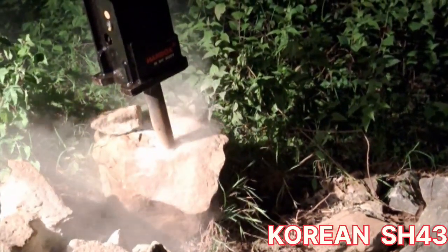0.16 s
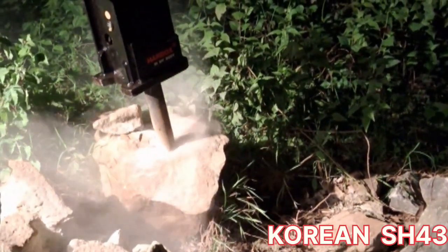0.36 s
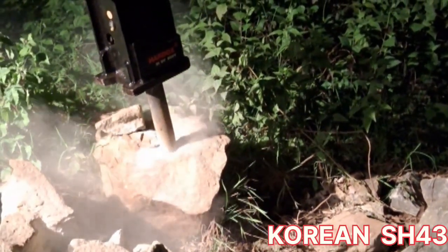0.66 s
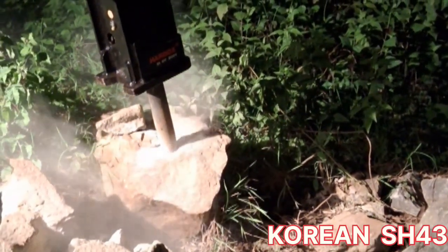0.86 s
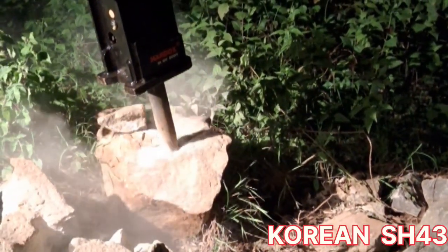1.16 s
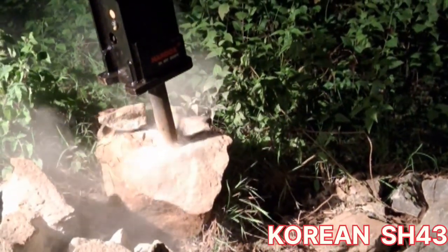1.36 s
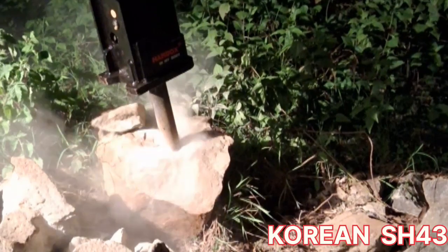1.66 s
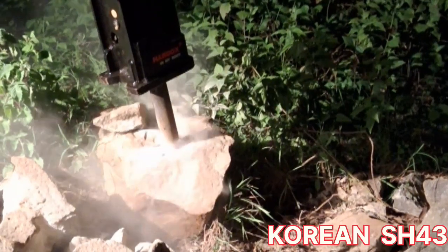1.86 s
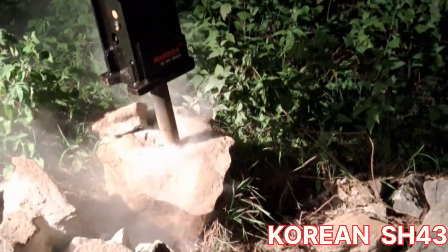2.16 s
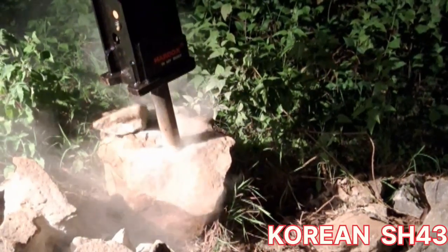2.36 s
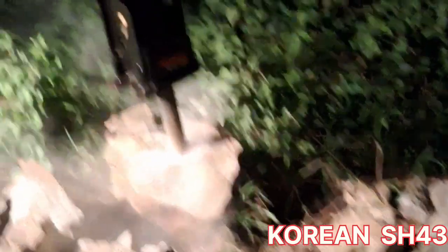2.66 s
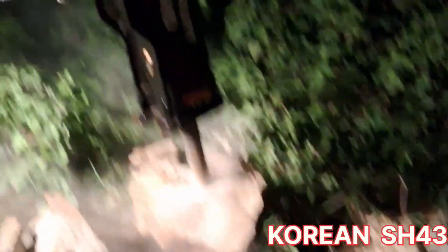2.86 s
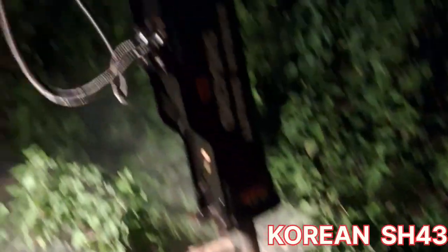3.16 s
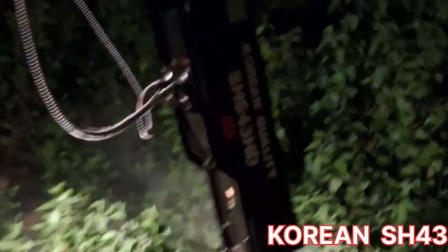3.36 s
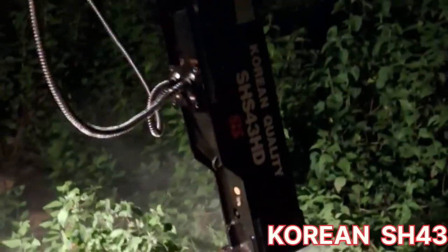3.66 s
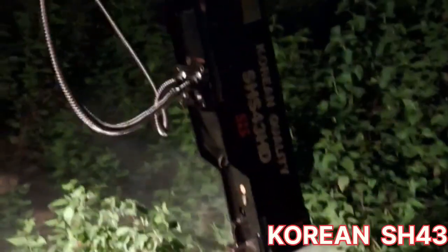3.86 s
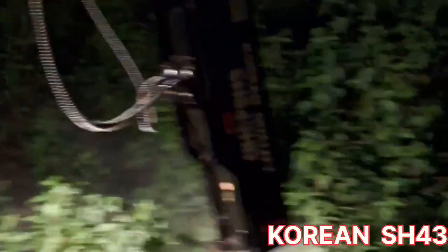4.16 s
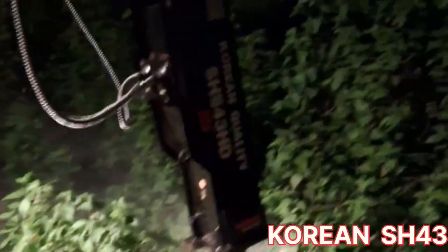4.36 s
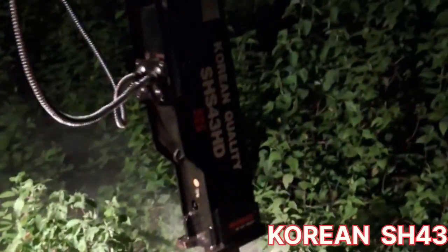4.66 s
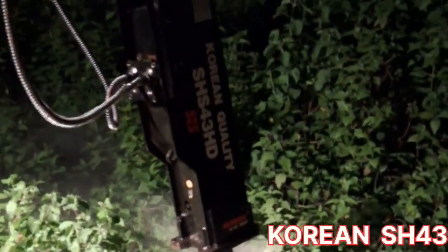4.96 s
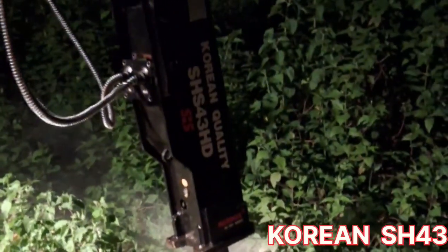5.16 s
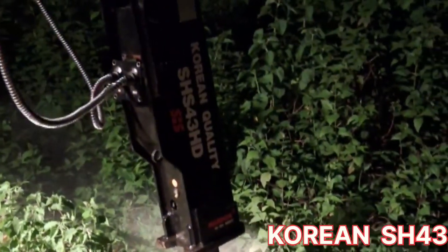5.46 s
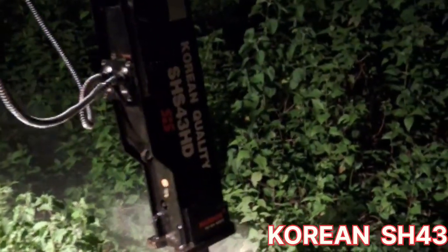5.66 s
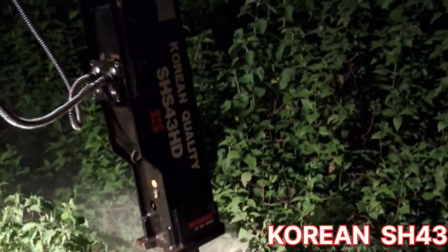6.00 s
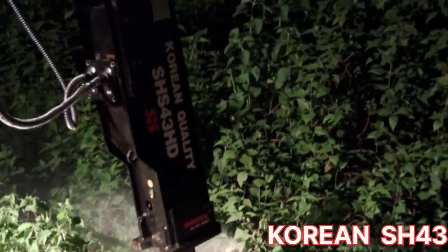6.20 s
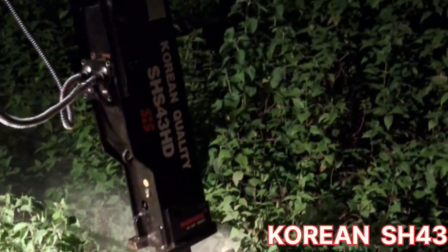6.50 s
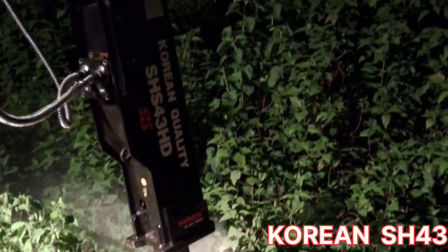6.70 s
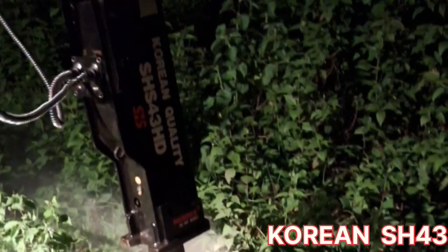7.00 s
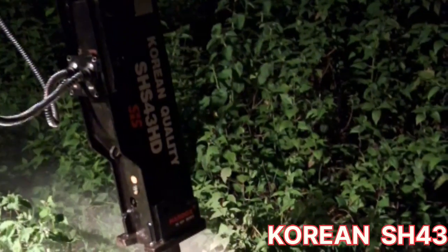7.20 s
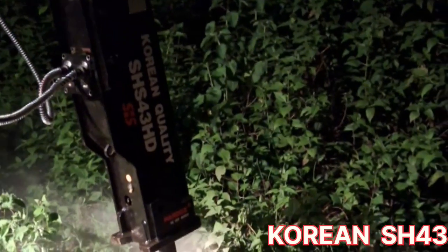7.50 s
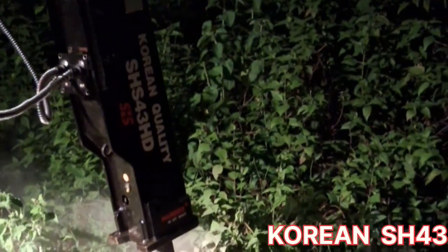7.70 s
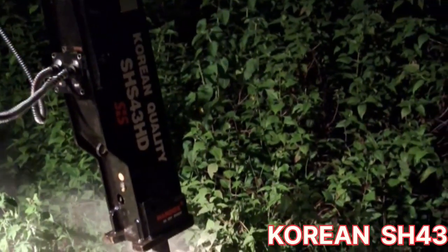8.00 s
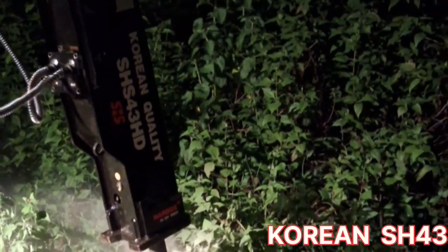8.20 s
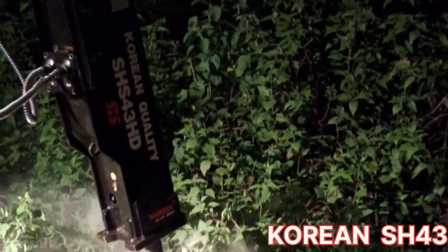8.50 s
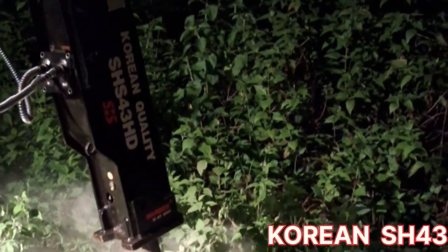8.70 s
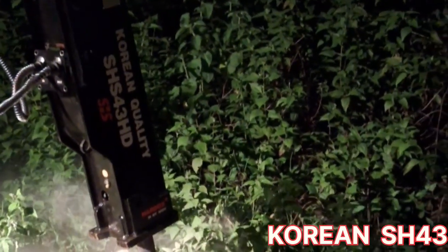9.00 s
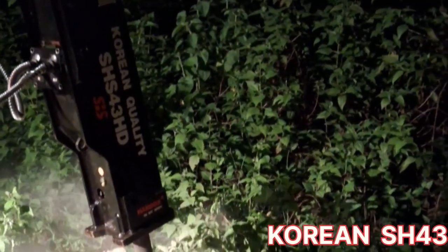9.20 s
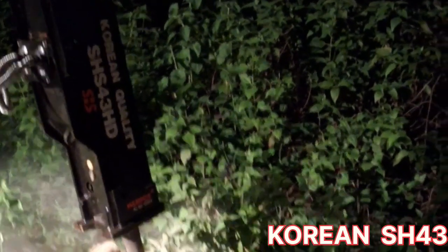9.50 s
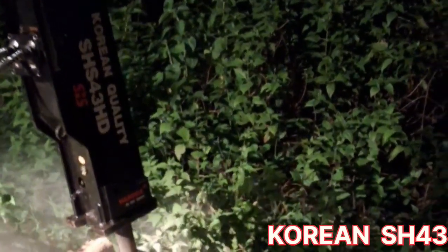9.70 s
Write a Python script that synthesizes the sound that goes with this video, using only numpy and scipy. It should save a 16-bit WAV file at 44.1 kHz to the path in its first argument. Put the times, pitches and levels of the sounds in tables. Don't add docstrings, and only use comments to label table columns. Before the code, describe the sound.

A hydraulic breaker hammers a boulder in three rapid bursts of ringing metallic blows, loose parts rattling, with a diesel engine idling behind in the pauses.

```python
import sys
import numpy as np
from scipy import signal
from scipy.io import wavfile
from scipy.ndimage import uniform_filter1d

SR = 44100
rng = np.random.default_rng(int(sys.argv[2]) if len(sys.argv) > 2 else 0)


def inscribe(sig):
    pcm = np.round(np.clip(np.atleast_2d(sig).T, -1, 1) * 32767)
    wavfile.write(sys.argv[1], SR, pcm.astype(np.int16))


def gain_from_db(level_db):
    decades = np.asarray(level_db, float) / 20
    return 10 ** decades


N = 434364


def breaker():
    s, housing_db, chisel_db, rattle_db, crack_db, chisel_hz = blows()
    out = crack(s, crack_db, housing_db + 2.5)
    out += chisel(s, chisel_db, chisel_hz, aim_at(s))
    out += housing(s, housing_db)
    out += steel(s, rattle_db)
    out += rattle(s, rattle_db)
    out += valve(s, rattle_db)
    return signal.sosfilt(signal.butter(2, 80, "high", fs=SR, output="sos"), out) + oil()


# blow number, time in seconds.
PACE = [(0, .0685), (5, .5257), (6, 1.1945), (12, 1.7332), (22, 2.6493), (27, 3.1040), (38, 4.1108),
        (50, 5.2135), (59, 6.0388), (68, 6.8658), (69, 7.5180), (73, 7.8772), (76, 8.1537), (78, 8.3420),
        (81, 8.6277)]


def strokes():
    number = np.arange(PACE[-1][0] + 1)
    s = np.interp(number, *np.transpose(PACE))
    opens = np.r_[True, np.diff(s) > .3]
    since = number - np.maximum.accumulate(number * opens)
    limp_s, limp_blows = .0018, 6
    late_s = limp_s * (since % 2) * np.exp(-since / limp_blows)
    return s + late_s, s[opens], s[np.r_[opens[1:], True]]


# time in seconds, aim from 0 to 1.
AIM = [
    (0, 0.02),
    (2.8, 0),
    (3.3, 0.59),
    (5.2, 0.57),
    (6.9, 1),
    (8.7, 0.81),
]


def aim_at(s):
    return np.interp(s, *np.transpose(AIM))


# time in seconds, force of the blows in dB,
# damping of the chisel by the stone in dB, recoil into the housing in dB.
TOOL = [(0, 0, -5, 0), (.55, 0, -6.5, 0.5), (1.2, -0.5, -2, -2.5), (1.6, -0.5, -4, 0.5), (1.85, 2, -3, 0.5),
        (2.9, 0, -4.5, 2), (3.3, 1, -2.5, -2.5), (3.47, -1.5, 1, 3.5), (3.75, -2.5, -2, -1.5),
        (4.0, 0, -3, -0.5), (4.5, 1.5, -4, -1.5), (5.3, 1, -3.5, 0), (5.55, 2.5, 3, -1), (6.25, 1, 1.5, 1),
        (6.9, 0.5, -2.5, -1.5), (7.6, 0, 1.5, -1), (8.05, 0, -5.5, 2.5), (8.65, 1.5, 4, 1)]


def blows():
    s = strokes()[0]
    aim, luck = aim_at(s), rng.standard_normal((len(s), 5))
    at, *columns = np.transpose(TOOL)
    force_db, damping_db, recoil_db = [np.interp(s, at, c) for c in columns]

    def level(tip_db, aim_gain_db, spread_db, chance):
        return tip_db + aim_gain_db * aim + spread_db * chance

    housing_db = level(-19.5, 5, 1, luck[:, 0]) + force_db + recoil_db
    chisel_db = level(-6.5, -3, 0.65, luck[:, 1]) + force_db - damping_db
    rattle_db = level(-21.5, 4.35, 1.3, luck[:, 2]) + force_db
    crack_db = level(-6.5, 3, .5, luck[:, 3])
    chisel_hz = 1950 + (30 + 40 * aim) * luck[:, 4]
    return s, housing_db, chisel_db, rattle_db, crack_db, chisel_hz


# delay in ms, level in dB, polarity.
CONTACTS = [
    (2.35, 4.5, -0.37),
    (6.4, -3, -1.24),
    (9.0, -52, -1.1),
    (11.2, -4.5, -0.99),
    (16.5, -19.5, -1.64),
]


def contacts(times, first_db, later_db):
    out, draws = train(times, first_db), rng.standard_normal((len(times), len(CONTACTS), 2))
    for k, (ms, db, polarity) in enumerate(CONTACTS):
        late_s = ms / 1000 * (1 + 0.012 * draws[:, k, 0])
        out = out + polarity * train(times + late_s, later_db + db + 3.7 * draws[:, k, 1])
    return out


def crack(times, first_db, later_db):
    t = np.arange(-60, 61) / SR
    cycle = np.sin(2 * np.pi * 1000 * t) * np.exp(-(t / .0004) ** 2)
    return np.convolve(contacts(times, first_db - .3, later_db), cycle, "same") * gain_from_db([[1.8], [-1.8]])


def chisel(times, levels_db, pitches_hz, aims):
    out, t = np.zeros((2, N + 4000)), np.arange(4000) / SR
    slack = t + .18 * .003 * (1 - np.exp(-t / .003))
    wider_by, shorter_by = 0.85, 0.44
    side = np.array([0, 1, 1, 1])
    draws = rng.standard_normal((len(times), 2, 4, 3))
    for s, db, hz, aim, draw in zip(times, levels_db, pitches_hz, aims, draws):
        spread = np.array([-0.0264, -0.103, 0.034, 0.139]) * (1 + wider_by * aim)
        spread = spread + 0.023 * draw[0, :, 0] * side
        mode_db = np.array([0, -5, -3, -8]) - 4 * (1 - aim) * side
        sizes = gain_from_db(db - 5 + mode_db + 1.6 * draw[..., 1])
        tone = np.sin(2 * np.pi * hz * (1 + spread)[:, None] * slack + .35 * draw[..., 2:])
        free_s = np.maximum(t / (1 - shorter_by * aim) - .0055, 0)
        shape = (1 - np.exp(-t / .0004)) * gain_from_db(-60 * free_s / .024)
        at = round((s + 0.001778) * SR)
        out[:, at:at + len(t)] += np.sum(sizes[..., None] * tone, axis=1) * shape
    return out[:, :N]


# pitch in Hz, level in dB, t60 in seconds.
HOUSING = [(178.8, -18, 0.89), (204.8, -24, 0.55), (275.4, -32, 0.99), (484.7, -3.5, 0.16),
           (609.3, 2, 0.27), (663.5, -7, 0.32), (680.6, -1, 0.18), (929, -9, 0.39), (967, -2, 0.071),
           (1200, -54, .12)]
LOWER_PLATE = [(413.3, -10, 0.71)]
UPPER_PLATE = [(488, -8, .12), (598, -3, .13)]


def housing(s, housing_db):
    shocks = blow_train(s, housing_db)
    shaking = gain_from_db(-4) * chatter(dying(shocks, t60=0.072, rise_s=0.011), per_s=1500)
    shaking += gain_from_db(-20.0) * habit(shocks, length_s=0.0071, rise_s=0.0055)
    struck = gain_from_db(6.0) * contacts(s, housing_db - 0.5, housing_db) * [[1], [.3]]
    clamp = dying(train(np.r_[0, s], 0), t60=.24, rise_s=.012)
    aim, held = aim_at(np.arange(N) / SR), pressure_gain()
    lower_db = -14 - 40 * np.maximum(aim - 0.59, 0)
    out = held * gain_from_db(lower_db) * modes(LOWER_PLATE, shaking)
    out += held * gain_from_db(-36 + 18 * aim) * modes(UPPER_PLATE, shaking)
    return out + gain_from_db(-13.5) * clamp * modes(HOUSING, shaking + struck)


def habit(clicks, length_s, rise_s):
    t = np.arange(2000) / SR
    shove = rng.standard_normal((2, len(t))) * (t / rise_s) * np.exp(-t / length_s) * [[1], [.4]]
    return signal.oaconvolve(clicks[None], shove, axes=1)[:, :N]


# pitch in Hz, level
# in dB, t60 in seconds.
STEEL = [(1800, -2, 0.034), (1987, -8, 0.13), (2225, -1, 0.044), (2500, -39.5, 0.082), (3110, -1, 0.021),
         (3347, -7.5, 0.067), (3802, -6, 0.031), (4860, -7, 0.028), (5126, -12, 0.054), (6768, -9, 0.032),
         (6730, -26.5, 0.31), (7180, -14, 0.049), (7440, -10, 0.011)]
HIGH_STEEL = [(8600, -17, .04), (8885, -14, .045), (10700, -11, .017), (10950, -15, .035), (11150, -11, .025),
              (11650, -12, .012), (12100, -14, .012), (12950, -12, .015), (13150, -15, .03), (13450, -13, .025),
              (15070, -12, .018)]


def steel(s, rattle_db):
    jolts = dying(rattle_train(s, rattle_db), t60=0.11, rise_s=0.000076)
    shaken = pressure_gain() * (jolts + gain_from_db(1.0) * valve_shift(s, rattle_db))
    return gain_from_db(-13.0) * modes(STEEL + HIGH_STEEL, chatter(shaken, per_s=3000))


# pitch in Hz, level in dB per Hz; then pitch in Hz, t60 in seconds.
RATTLE = [(120, -40), (330, -27), (560, -6.5), (800, -12.5), (1000, -8), (1300, -18), (2000, -2),
          (2730, -16), (4500, -14), (6000, -28.5), (9800, -30.5), (12000, -37), (16400, -35)]
RATTLE_T60 = [(150, 0.28), (600, 0.16), (2000, 0.14), (5000, 0.17), (15000, 0.4)]


def rattle(s, rattle_db):
    jolts = rattle_train(s, rattle_db)

    def envelope_at(hz):
        return dying(jolts, at_hz(RATTLE_T60, hz), rise_s=0.000079)

    return gain_from_db(2.5) * pressure_gain() * banded_noise(RATTLE, envelope_at, patchy_db=0.0, lowest_hz=100)


# pitch in Hz, level in dB per Hz.
VALVE = [(1500, -4), (3000, -8), (6000, -7), (11000, -18), (16500, -15)]


def valve(s, rattle_db):
    shift = valve_shift(s, rattle_db)
    return pressure_gain() * banded_noise(VALVE, lambda hz: shift, patchy_db=3.5, lowest_hz=790)


def valve_shift(s, rattle_db):
    return dying(train(s - .020, -35.5 + 0.15 * (rattle_db + 6)), t60=0.45, rise_s=0.0028)


def blow_train(s, levels_db, delay_s=0):
    return train(np.r_[0, s] + delay_s, np.r_[levels_db[0] - 5, levels_db])


def rattle_train(s, rattle_db):
    return blow_train(s, rattle_db, delay_s=0.00132)


def load():
    _, firsts, lasts = strokes()
    t = np.arange(N) / SR

    def ramp(s):
        return np.clip((t - s) / 0.024 + .5, 0, 1)

    return 1 + sum(ramp(s - 0.051) for s in firsts[1:]) - sum(ramp(s + 0.082) for s in lasts)


def pressure_gain():
    return gain_from_db(-2.5 * (1 - load()))


# time in seconds, level in dB, rise in seconds.
VENTS = [
    (.78, -52, 0.092),
    (9.85, -52, .15),
]


def oil():
    t, fall_s = np.arange(N) / SR, 0.013
    puffs = [(s - fall_s, -34, 0.072) for s in strokes()[1][1:]] + VENTS
    level = 0
    for s, db, rise_s in puffs:
        away = np.maximum((s - t) / rise_s, (t - s) / max(rise_s, fall_s))
        level = level + gain_from_db(db - 30 * away)
    high = signal.butter(2, [10500, 16500], "band", fs=SR, output="sos")
    return level * rms_one(signal.sosfilt(high, rng.standard_normal((2, N))))


# time in seconds, level in dB, share of its low modes in dB.
CLANKS = [
    (.791, -35, -13),
    (9.006, -36.5, 1),
]
# pitch in Hz, level in dB, t60 in seconds.
PIN = [(670, 0, .05), (940, -7, .06), (1650, -2, .035), (2050, -5, .03), (2350, -2, .025)]


def pin():
    s, peak_db, low_db = np.transpose(CLANKS)

    def knock(db):
        return chatter(dying(train(s, db), t60=0.04, rise_s=0.00038), per_s=7000)

    return gain_from_db(-8) * (modes(PIN[:3], knock(peak_db + low_db)) + modes(PIN[3:], knock(peak_db)))


# time in seconds, second order in Hz, throttle in dB, pump whine in dB.
THROTTLE = [(0, 94, 1, -2), (1.1, 94, 1.5, -22), (7.0, 94.5, 4.5, -1), (7.45, 94.5, 2.5, -1.5),
            (8.6, 94.3, 7, -10), (8.85, 96.5, 4, -5), (9.45, 96.5, 3, -17), (9.65, 96.6, 3, 0),
            (9.85, 97, 7.5, -8)]
ORDERS = [.5, 1, 1.5, 3, 3.5, 5]
ORDER_DB = [-7.5, -1.5, -16, -8, -18, -16]
WHINE_ORDERS = [7.5, 10.5]
# pitch in Hz, level in dB, t60 in seconds.
PUMP = [(286.6, -5.5, 0.053), (712.6, -0.5, 0.25), (980, 6, 0.12), (1300, -19, 0.1), (1350, -29, 0.069)]
# pitch in Hz, level in dB per Hz.
IDLE = [(25, -28), (40, -29), (70, -31), (120, -15.5), (180, -13), (290, -19), (400, -16), (690, -20),
        (1000, -19), (1500, -20.5), (4100, -30), (5500, -37), (14000, -41), (16400, -38)]


def engine():
    (free_hz, throttle_db, whine_db), work = in_time(THROTTLE), load()
    hz = free_hz - .9 * work
    hum_db = -48.5 + throttle_db - .5 * work
    noise_db = -52.5 + throttle_db + 9.5 * work
    turns = 2 * np.pi * np.cumsum(hz) / SR

    def wander():
        return 0.24 * drift(5.6)

    hum = 0
    for k, db in zip(ORDERS, ORDER_DB):
        ears = np.array([wander(), 0.16 + wander()])
        hum = hum + gain_from_db(db + 0.82 * drift(6.4)) * np.sin(k * (turns + wander()) + ears)
    whine = 0
    for k in WHINE_ORDERS:
        whine = whine + gain_from_db(-58 + whine_db + 2 * drift(6)) * np.sin(k * turns + .6 * drift(15))
    pump = gain_from_db(-4.5) * rms_one(modes(PUMP, rng.standard_normal((2, N))))
    block = banded_noise(IDLE, lambda hz: 1, patchy_db=.7, lowest_hz=25)
    return np.sqrt(2) * (gain_from_db(hum_db) * hum + whine) + gain_from_db(noise_db) * (pump + block)


def rms_one(x):
    return x / np.sqrt(np.mean(x ** 2) + 1e-20)


def in_time(rows):
    s, *columns = np.transpose(rows)
    return [np.interp(np.arange(N) / SR, s, c) for c in columns]


def at_hz(points, hz):
    table_hz, values = np.transpose(points)
    return np.interp(np.log(hz), np.log(table_hz), values)


def drift(rate):
    r = np.exp(-80 * np.pi * rate / SR)
    slow = signal.lfilter([1], [1, -2 * r, r * r], rng.standard_normal(N // 40 + 2002))[2000:]
    return np.interp(np.arange(N) / 40, np.arange(len(slow)), rms_one(slow))


def train(times, levels_db):
    clicks = np.full(N, 1e-18)
    clicks[np.clip(np.round(np.asarray(times) * SR).astype(int), 0, N - 1)] = gain_from_db(levels_db)
    return clicks


def dying(clicks, t60, rise_s):
    r, up = gain_from_db(-60 / (t60 * SR)), np.exp(-1 / (rise_s * SR))
    return signal.lfilter([1 - up], [1, -up], signal.lfilter([1], [1, -r], clicks))


def chatter(envelope, per_s):
    return envelope * (rng.random((2, N)) < per_s / SR) * rng.standard_normal((2, N)) + 1e-18


def ring(force, hz, t60):
    r, w = gain_from_db(-60 / (t60 * SR)), 2 * np.pi * hz / SR
    return signal.lfilter([0, np.sin(w)], [1, -2 * r * np.cos(w), r * r], force)


def modes(table, force):
    return sum(gain_from_db(db) * pair(*ring(force, hz, t60), hz) for hz, db, t60 in table)


def banded_noise(spectrum, envelope_at, patchy_db, lowest_hz):
    edges = 2 ** np.arange(np.log2(lowest_hz), np.log2(18200), .5)
    centres = np.sqrt(edges[1:] * edges[:-1])
    total = np.sqrt(np.sum(gain_from_db(at_hz(spectrum, centres)) ** 2 * np.diff(edges)) / (SR / 2))
    out, white = 0, rng.standard_normal((2, 2, N))
    for k, hz in enumerate(centres):
        band = signal.butter(2, edges[k:k + 2], "band", fs=SR, output="sos")
        mid, side = signal.sosfilt(band, white[k % 2])
        gain = gain_from_db(at_hz(spectrum, hz) + patchy_db * drift(36)) / total
        out = out + gain * envelope_at(hz) * pair(mid, side, hz)
    return out


# pitch in Hz, left-right likeness; then pitch in Hz, left over right in dB.
LIKENESS = [(60, 0.88), (180, 1), (550, 0.62), (1650, 0.023), (4970, 0.019), (15000, 0.01)]
LEFT_OVER_RIGHT = [(60, 0), (130, 1), (290, 3), (640, -1), (1200, 2.5), (2000, 1.5), (4000, -1.3),
                   (8000, -1.7), (15000, .6)]


def pair(mid, side, hz):
    alike, lean_db = np.clip(at_hz(LIKENESS, hz), 0, 1), at_hz(LEFT_OVER_RIGHT, hz) / 2
    both = np.sqrt(1 + alike) * mid + np.sqrt(1 - alike) * side * [[1], [-1]]
    return both * gain_from_db([[lean_db], [-lean_db]])


def scene():
    out = breaker() + pin() + engine() * gain_from_db([[-1.2], [1.2]])
    return np.array([np.roll(out[0], 2), out[1]])


def starved(x, margin_db, edge_db):
    hz, _, frames = signal.stft(x, SR, nperseg=1536)
    bands = frames[:, :768].reshape(2, 96, 8, -1)
    level_db = 10 * np.log10(np.mean(np.abs(bands) ** 2, axis=(0, 2)) + 1e-20)
    centre = hz[4:768:8, None]
    around_db = 10 * np.log10(uniform_filter1d(10 ** (level_db / 10), size=15, axis=0))
    usual_db = uniform_filter1d(level_db, size=9, axis=1)
    weak = (level_db < around_db - margin_db) & (centre > 5000)
    weak |= (centre > 15200) & (level_db < usual_db + edge_db)
    frames[:, :768] = (bands * np.where(weak, .03, 1)[:, None]).reshape(2, 768, -1)
    return signal.istft(frames, SR, nperseg=1536)[1][:, :N]


def roll_off(x):
    return signal.sosfilt(signal.butter(12, 16500, fs=SR, output="sos"), x)


def record(dry):
    rounded = .98 * np.tanh(dry / .98)
    lean = starved(rounded, margin_db=4.8, edge_db=-1.5)
    top = signal.cheby2(24, 50, 15900, fs=SR, output="sos")
    return roll_off(signal.sosfilt(top, lean))


dry = scene()
out = record(dry)
inscribe(out)
```